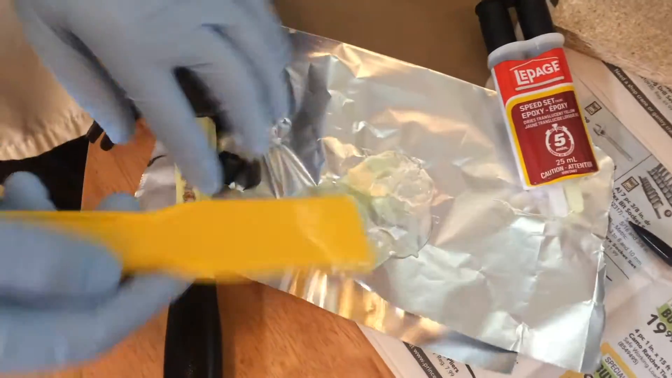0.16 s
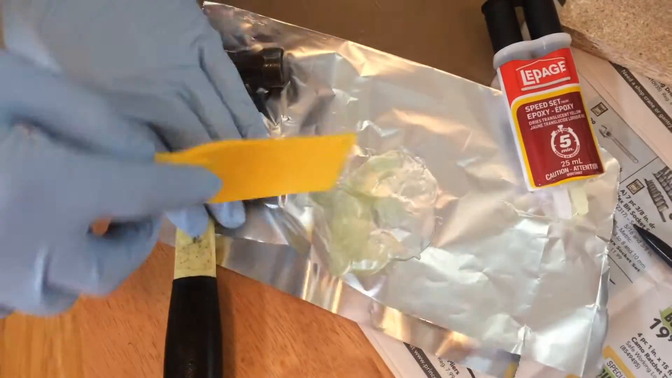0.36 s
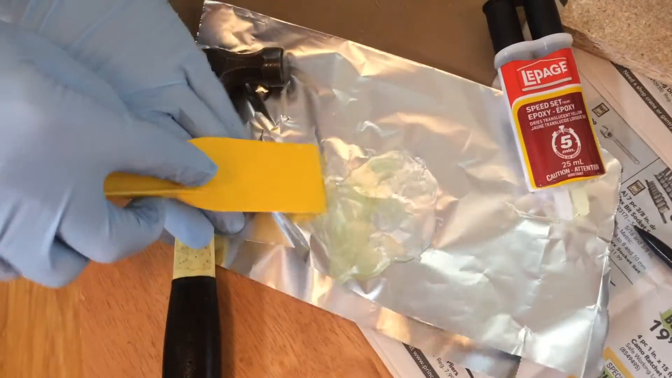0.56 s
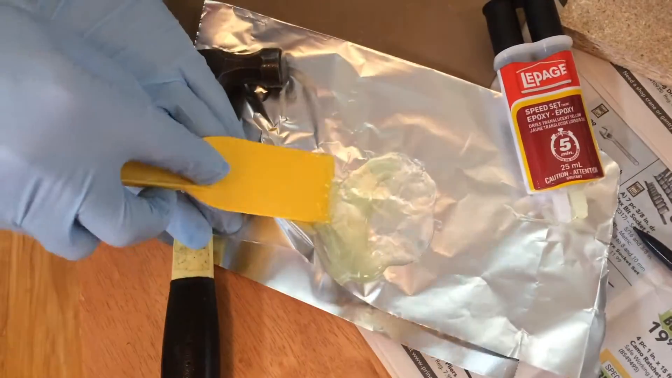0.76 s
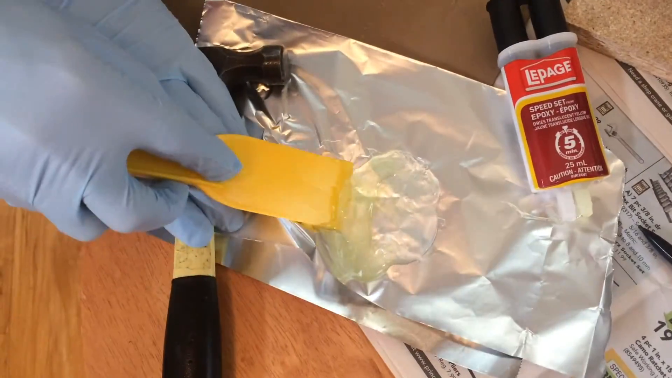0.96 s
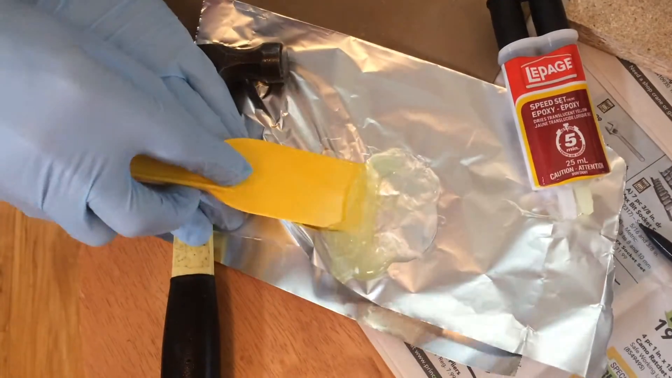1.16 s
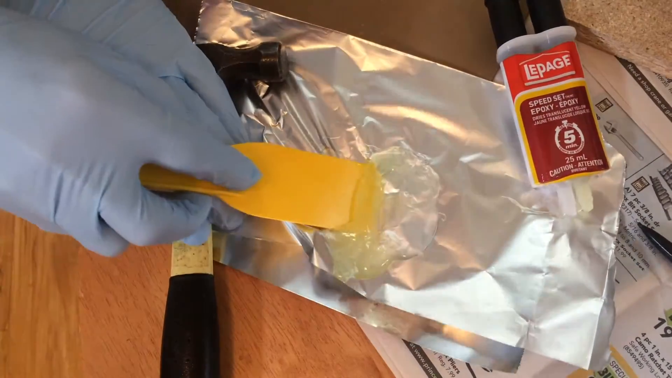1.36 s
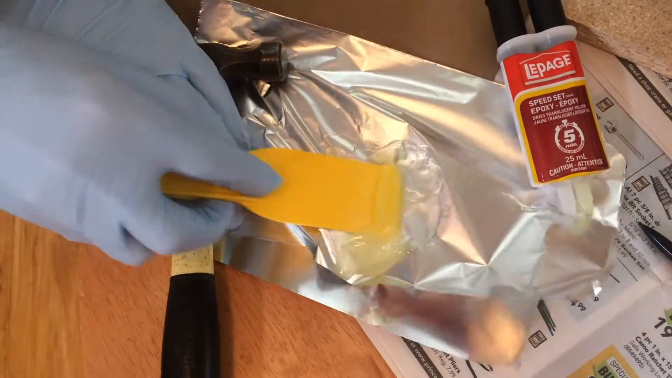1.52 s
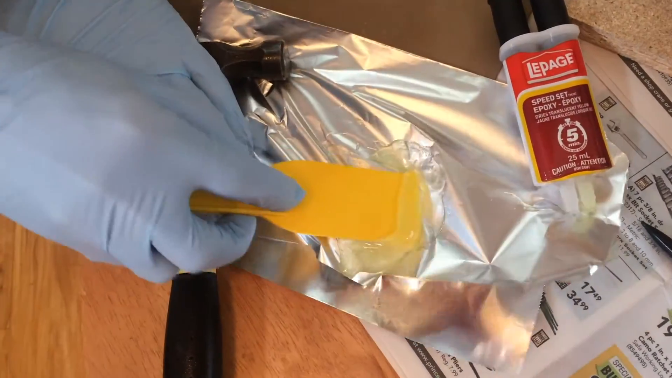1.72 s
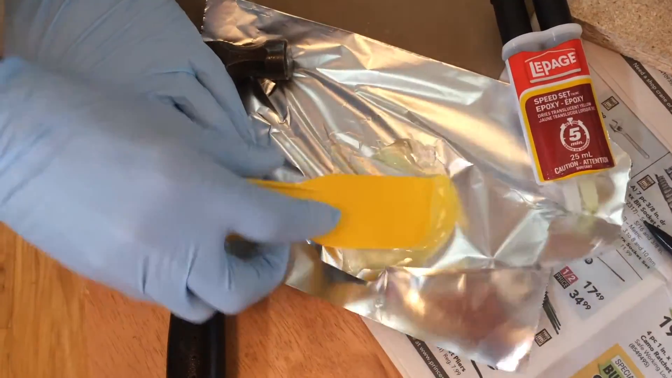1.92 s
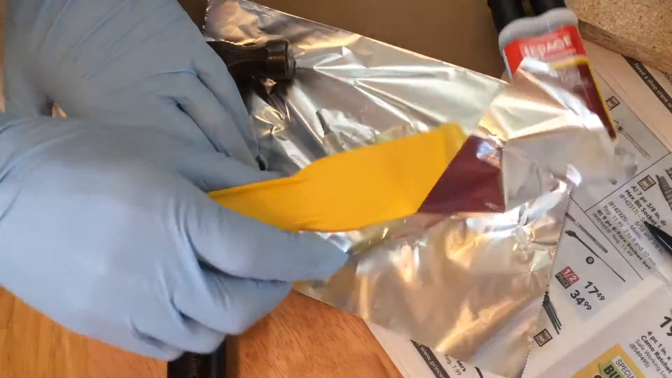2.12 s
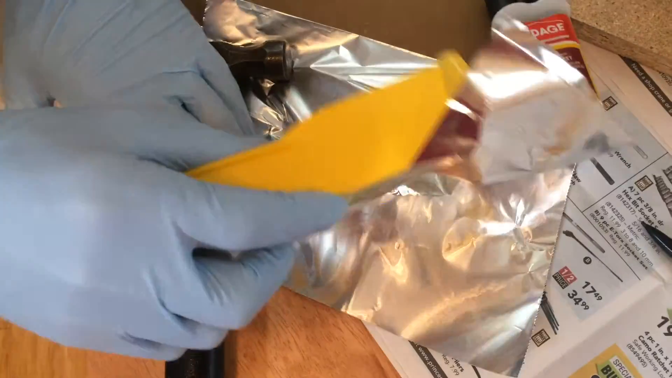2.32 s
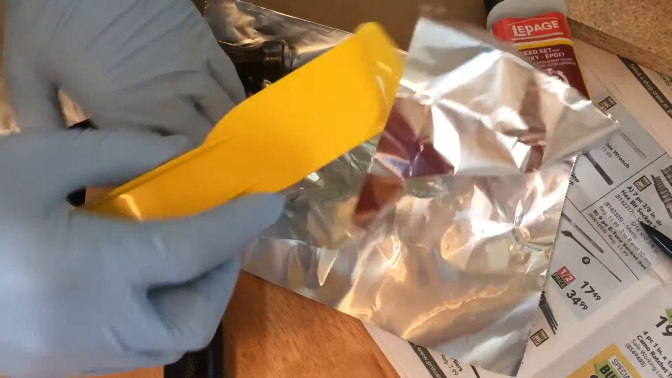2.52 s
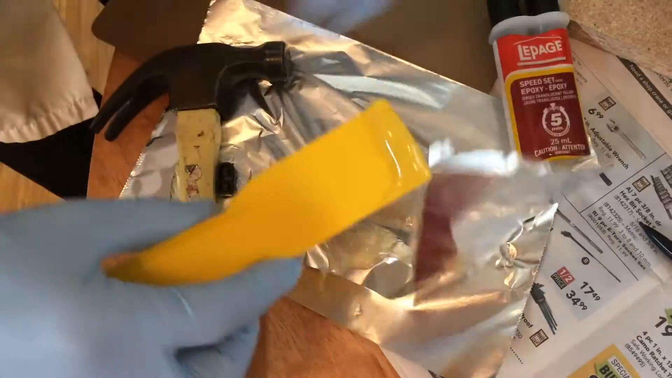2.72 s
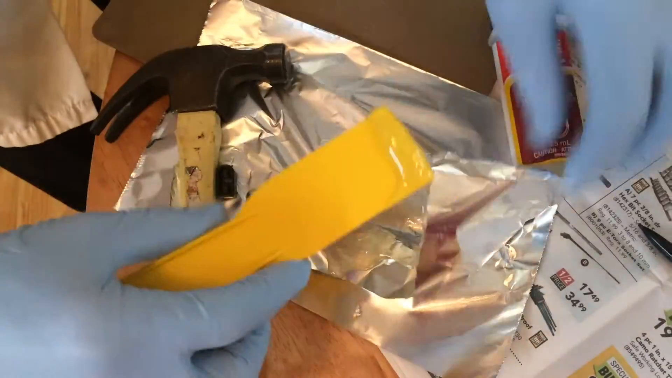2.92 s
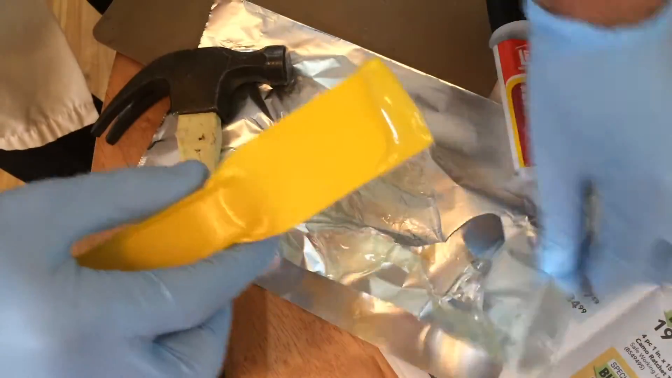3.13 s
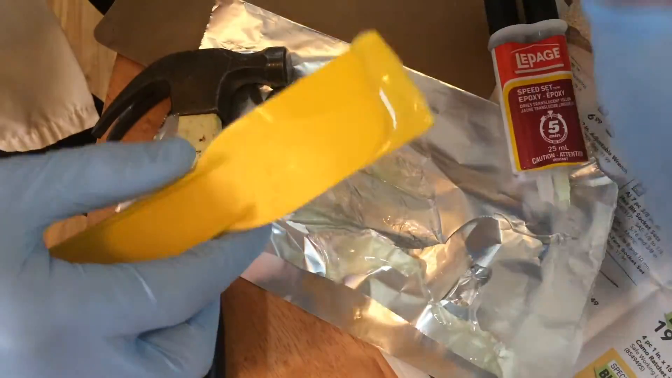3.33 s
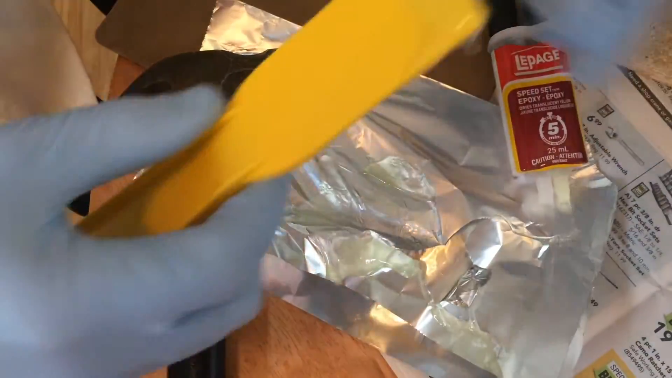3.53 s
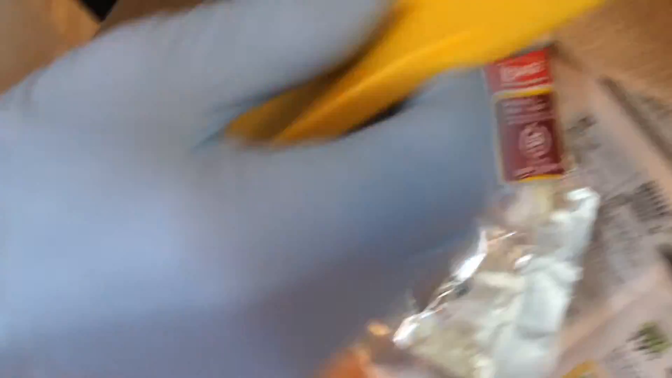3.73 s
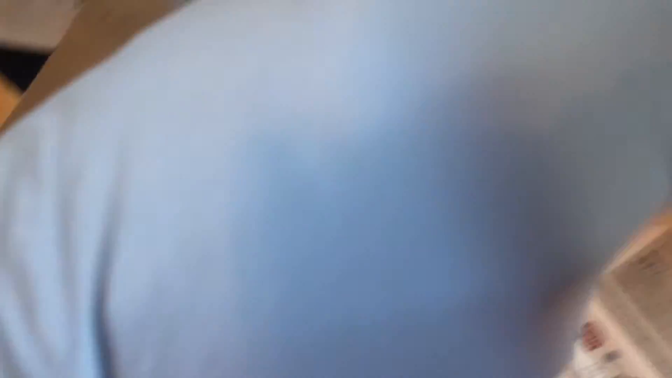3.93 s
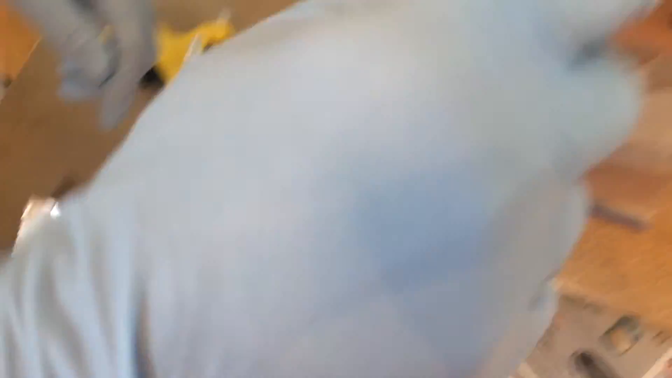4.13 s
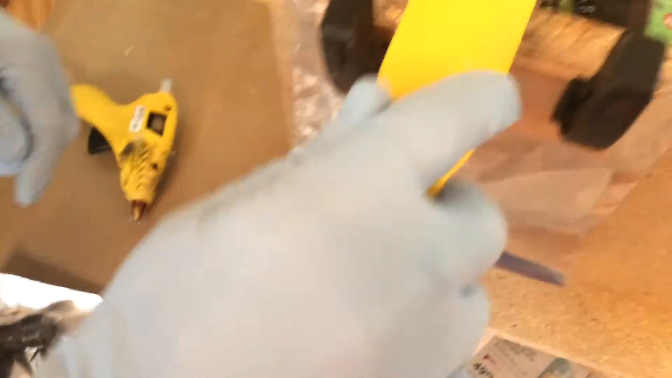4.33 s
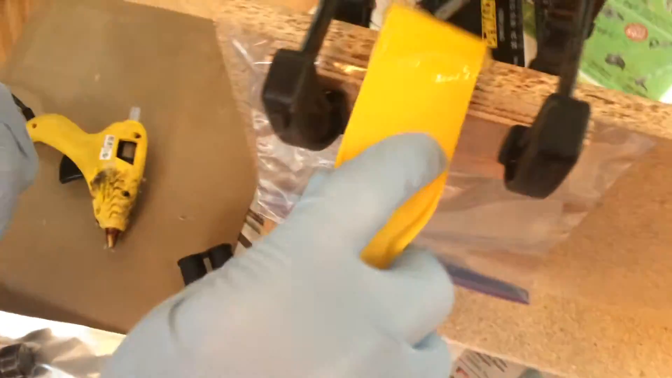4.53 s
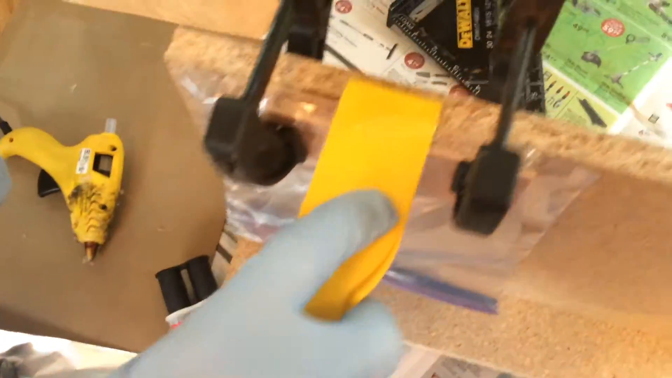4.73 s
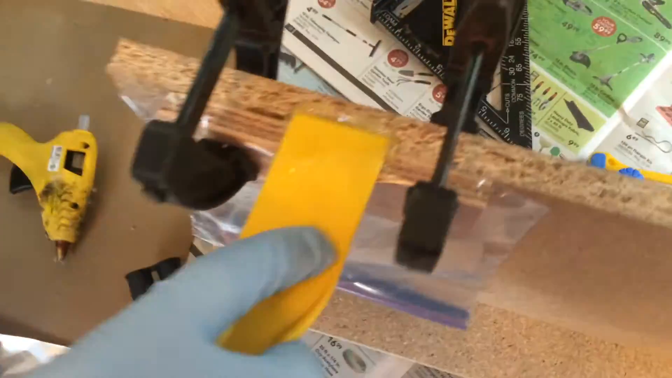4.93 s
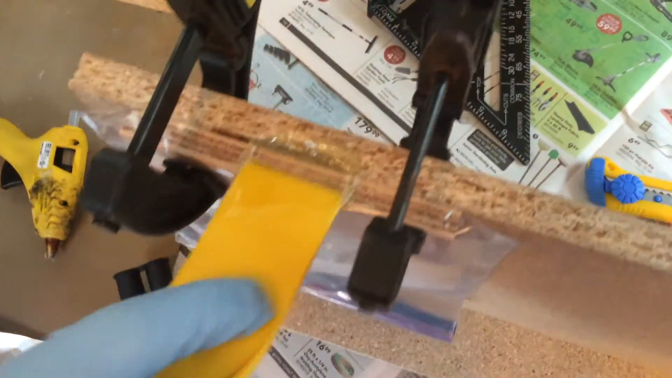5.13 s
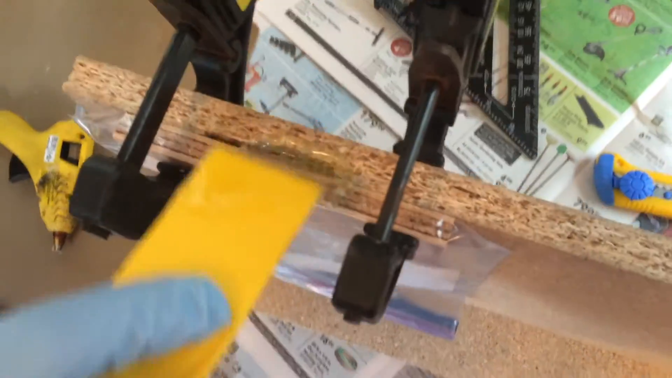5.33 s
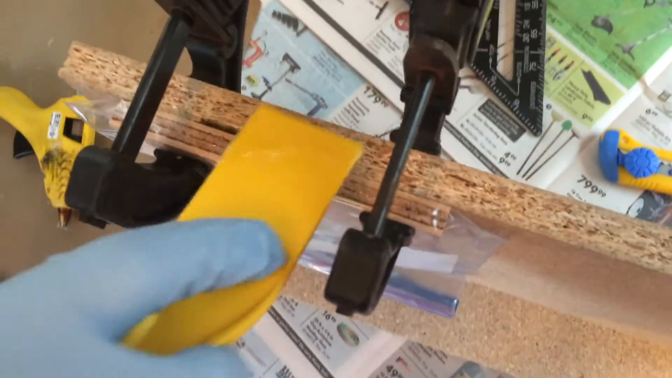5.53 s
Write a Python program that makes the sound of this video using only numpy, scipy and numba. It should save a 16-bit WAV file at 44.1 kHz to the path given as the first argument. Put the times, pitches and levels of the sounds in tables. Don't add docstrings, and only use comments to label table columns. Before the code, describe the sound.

Foil on a wooden workbench, heard close in a small quiet room with slight echo: scattered crisp pops at first, a sparse pressing stretch, then loud scraping bursts and dense peeling crackle. A brief lull, a sharp knock, a dull slap and another loud crumple come next. Finally, rubber gloves hiss softly and glue ticks lightly over faint ventilation and mains hum.

```python
import sys
import numpy as np
from scipy import signal
from scipy.fft import rfft, irfft
from scipy.io import wavfile
from scipy.ndimage import uniform_filter1d
from numba import njit

SR = 44100
rng = np.random.default_rng(int(sys.argv[2]) if len(sys.argv) > 2 else 0)


def gain_from_decibels(decibels):
    exponent = np.asarray(decibels, float) / 20
    return 10 ** exponent


def master_out(mix):
    frames = np.transpose(np.atleast_2d(mix))
    ceiling = np.clip(frames, -1, 1)
    pcm = np.round(ceiling * 32767).astype(np.int16)
    wavfile.write(sys.argv[1], SR, pcm)


N = 249606


def unit(x):
    return x / np.sqrt(np.mean(x ** 2))


def colour(x, points):
    hz, db = np.transpose(points)
    f = np.fft.rfftfreq(len(x), 1 / SR) + 1
    gain = gain_from_decibels(np.interp(np.log(f), np.log(hz), db))
    return irfft(rfft(x) * gain, len(x))


def band(x, lo_hz, hi_hz):
    return signal.sosfilt(signal.butter(2, [lo_hz, hi_hz], "band", fs=SR, output="sos"), x)


def decay(t, t60):
    return np.exp(-np.log(1000) * t / t60)


def grains(rate, spread_db, t60):
    hits = (rng.random(N) < rate / SR) * gain_from_decibels(2 * spread_db * rng.exponential(size=N))
    power = signal.lfilter([1], [1, -decay(2 / SR, t60)], hits)
    return unit(np.sqrt(power + 1e-9))


@njit
def bursts(start, size, hold, t60, hz, width, kick, noise, grit, rise, strike):
    out = np.zeros(len(noise))
    for e in range(len(start)):
        g, k = np.tan(np.pi * hz[e] / SR), width[e] / hz[e]
        norm = 1 + g * (g + k)
        level = size[e] * np.sqrt(SR / width[e])
        fade = np.exp(-np.log(1000) / (t60[e] * SR))
        band1, low1, band2, low2, front = 0., 0., 0., 0., kick
        stop = min(start[e] + hold[e] + int(t60[e] * SR) + 400, len(noise))
        for i in range(start[e], stop):
            age = i - start[e]
            swell = min(1., (age + 1) / (rise * hold[e] + 1))
            rough = grit[i] if age > 60 else 1.
            push = level * noise[i] * (rough + front) * swell
            if age == int(rise * hold[e]):
                push += level * strike[e]
            v = (band1 + g * (push - low1)) / norm
            band1, low1 = 2 * v - band1, low1 + 2 * g * v
            w = (band2 + g * (k * v - low2)) / norm
            band2, low2 = 2 * w - band2, low2 + 2 * g * w
            front *= .96
            level *= fade if age > hold[e] else 1 - .4 / (hold[e] + 1)
            out[i] += k * w
    return out


def snaps(table, ring_db, broad_db, treble_db, sharp, t60, kick, pop, rise, strike):
    s, db, hz, ms = np.transpose(table)
    one = np.ones(len(s))
    octaves = np.log2(hz / 3500)
    share_db = -3.5 + 3.5 * octaves
    start = (s * SR).astype(np.int64)
    hold = (np.clip(ms, 0, 60) * SR / 1000).astype(np.int64)
    fade_s = t60 * (np.clip(ms, .3, 30) / 4) ** 0.21
    crack_hz = 2700.0 * 2 ** (0.49 * octaves)
    blow = strike / (1 + (ms / 2.1) ** 2)
    grit = grains(1100, 1.5, .025)
    lone = (rng.random(N) < 260 / SR) * pop * rng.standard_normal(N)

    def layer(level_db, t60_s, centre_hz, width_hz):
        noise = rng.standard_normal(N) + lone
        return bursts(start, gain_from_decibels(level_db), hold, t60_s, centre_hz, width_hz,
                      kick, noise, grit, rise, blow)

    ring = layer(db + ring_db, 1.5 * fade_s, hz, np.hypot(hz / sharp, 450.))
    broad = layer(db + broad_db + 0.74 * share_db, fade_s, crack_hz, 2.0 * crack_hz)
    fizz = layer(db + share_db + treble_db, fade_s, 7600.0 * one, 17200.0 * one)
    return ring + broad + fizz


def room_air():
    # (frequency [Hz], level [dB per Hz])
    room_colour = [(30, -28), (49, -3), (69, -7.5), (87, -8), (186, -9.5), (255, -13), (390, -13.5),
                   (480, -17.5), (1100, -19), (1500, -25.5), (4000, -30), (8000, -32.5), (15300, -41.5)]
    # (frequency [Hz], level [dB], width [Hz])
    hum_bands = [(61.5, -73.5, 8.3), (179.9, -70, 9), (435, -67, 71)]
    tone = gain_from_decibels(-58) * unit(colour(rng.standard_normal(N), room_colour))
    hum = sum(gain_from_decibels(db) * unit(band(rng.standard_normal(N), f - w / 2, f + w / 2)) for f, db, w in hum_bands)
    mains = gain_from_decibels(-60.5) * np.sin(2 * np.pi * 61 * np.arange(N) / SR)
    return tone + hum + mains


def squeaks():
    # (time [s], length [s], level [dB])
    drags = [(3.73, 0.28, -65), (5.321, 0.092, -65)]
    t = np.arange(N) / SR
    shape = sum(gain_from_decibels(db) * np.sin(np.pi * np.clip((t - s) / length, 0, 1)) ** .5 for s, length, db in drags)
    centre_hz, width_hz = 1640, 150
    whistle = band(rng.standard_normal(N), centre_hz - width_hz / 2, centre_hz + width_hz / 2)
    return shape * unit(whistle)


def gloves():
    # (time [s], length [s], rustle level [dB], cupped-hand share [dB])
    strokes = [(3.385, 0.2, -58, -17), (3.616, 0.074, -53, -2.5), (3.71, 0.21, -57, -35),
               (3.925, 0.036, -50.5, -36), (3.972, 0.11, -53, -44), (4.087, 0.088, -56, -38),
               (4.166, 0.05, -53.5, -39), (2.857, 0.19, -56.5, -41), (4.24, 0.15, -60, -27),
               (4.392, 0.023, -52.5, -33.5), (4.462, 0.025, -55.5, -31), (4.71, 0.042, -61, -22),
               (4.548, 0.88, -72.5, -25), (5.179, 0.19, -75, -11)]
    # (frequency [Hz], level [dB per Hz])
    glove_colour = [(700, -3.5), (1500, -5), (3500, -3), (7000, -2.5), (10000, -7), (15300, -10.5)]
    attack_s, release_s = 0.026, 0.03
    t, hollow, broad = np.arange(N) / SR, 0, 0
    for s, length, db, cup_db in strokes:
        shape = np.clip((t - s) / attack_s, 0, 1) * np.exp(-np.clip(t - s - length, 0, None) / release_s)
        hollow = np.hypot(hollow, gain_from_decibels(db + cup_db) * shape)
        broad = np.hypot(broad, gain_from_decibels(db) * shape)
    hiss = grains(1800, 1.4, .025) * rng.standard_normal(N)
    cup = unit(band(hiss, 1900, 3200))
    return hollow * cup + broad * unit(colour(hiss, glove_colour))


def ping():
    # time [s], level [dB], frequency [Hz], t60 [s]
    s, db, hz, t60 = (3.8205, -46, 9800, .055)
    t = np.clip(np.arange(N) / SR - s, 0, None)
    return gain_from_decibels(db) * np.sin(2 * np.pi * hz * t) * decay(t, t60)


def sticky_ticks():
    # (time [s], peak [dB], ring [Hz], length [ms])
    ticks = [(2.998, -33.5, 1500, 1.5), (3.0075, -30.5, 4700, 4.9), (3.023, -25.5, 784, 7),
             (3.037, -22.5, 950, 16), (3.049, -24.5, 635, 11), (3.064, -25, 960, 10),
             (3.788, -40, 2200, 1.2), (3.7915, -36.5, 2300, 3.7), (3.7915, -34.5, 8000, 3.1),
             (3.8198, -25, 8550, 2.2), (3.823, -39, 7540, 9), (4.651, -43.5, 5580, 1.2),
             (4.6975, -29, 5140, 1.4), (4.6977, -23.5, 2240, .5), (4.702, -43, 4760, 6.9),
             (4.7105, -39.5, 2000, 4.5), (4.844, -42.5, 3230, 2.2), (4.8695, -43, 3400, 1.9),
             (4.915, -27, 2440, 0.6), (4.916, -40, 1300, 0.98), (4.967, -48, 1800, 0.99),
             (5.280, -51, 4560, .6), (5.2925, -35, 3700, 0.5), (5.2931, -32, 1040, 0.28),
             (5.298, -48, 995, 7.4), (5.348, -45, 1494, 0.75), (5.3826, -26.5, 3400, 0.3),
             (5.3945, -52, 8500, 1.1)]
    return snaps(ticks, ring_db=-10.5, broad_db=-21, treble_db=-28.5, sharp=1.46, t60=0.016,
                 kick=0.61, pop=0, rise=0., strike=4.6)


def bench(foil):
    # (frequency [Hz], level [dB], t60 [s])
    modes = [(193, 3, 0.03), (357, 2.5, 0.017), (743, 3.5, 0.013), (960, -1.5, 0.029), (1189, -8.5, 0.11),
             (573, -0.5, 0.013)]
    # (time [s], peak [dB], contact [ms])
    knocks = [(1.859, -19.5, 3.9), (2.641, -13.5, 5.6), (2.683, -29.5, 2.7), (2.705, -25, 1.2),
              (2.716, -26, 1.7), (2.7563, -2, 0.11), (2.789, -11.5, 1.8), (2.814, -26.5, 0.63),
              (2.829, -23, 1.3), (3.051, -25, 2.7), (3.19, -22, 2.4)]
    t = np.arange(SR // 4) / SR
    ring = sum(gain_from_decibels(db) * np.sin(2 * np.pi * f * t) * decay(t, np.clip(t60, .02, .2)) for f, db, t60 in modes)
    blows = np.zeros(N)
    shudder = np.zeros(N)
    for s, db, ms in knocks:
        push = np.hanning(int(ms * SR / 1000) + 3)
        at = int(s * SR)
        blows[at:at + len(push)] += gain_from_decibels(db) * push / push.sum()
        shudder += gain_from_decibels(db - 36.5) * np.exp(-np.abs(np.arange(N) / SR - s) / 0.03)
    worked = np.sqrt(np.abs(uniform_filter1d(foil ** 2, size=2000))) ** 0.9
    rumble = unit(band(signal.fftconvolve(rng.standard_normal(N), ring)[:N], 150, 670))
    knocking = signal.fftconvolve(blows, ring / np.abs(ring).max())[:N]
    return band(knocking, 200, 2100) + (gain_from_decibels(-33.5) * worked + shudder) * rumble


def patter(spread_db, t60, lo_hz, hi_hz, sharp, count, kick):
    when, pitch, long = rng.random((count, 3)).T
    start, hold = (when * N).astype(np.int64), np.zeros(count, np.int64)
    size = gain_from_decibels(spread_db * rng.exponential(size=count))
    hz = lo_hz * (hi_hz / lo_hz) ** pitch

    def layer(centre_hz, width_hz):
        return bursts(start, size, hold, t60 * (.5 + long), centre_hz, width_hz,
                      kick, rng.standard_normal(N), np.ones(N), 0., np.zeros(count))

    return layer(hz, hz / sharp), layer(np.full(count, 8100.0), np.full(count, 7200.0))


def crackle():
    # (time [s], crackle level [dB])
    effort = [(0.0, -29), (.3, -51), (.66, -34), (.9, -51.5), (1.38, -46.5), (1.53, -27.5), (1.74, -45.5),
              (1.979, -35), (2.171, -19.5), (2.33, -27), (2.558, -47.5), (2.749, -19), (2.88, -67),
              (2.988, -57), (3.192, -23), (3.288, -40.5), (3.343, -35.5), (3.43, -76.5)]
    effort_db = np.interp(np.arange(N) / SR, *np.transpose(effort), right=-120)
    body = gain_from_decibels(effort_db)
    treble = gain_from_decibels(-39 + 1.24 * (effort_db + 33.0))
    low, high = patter(1.6, .026, 1700., 6500., sharp=.9, count=5000, kick=0.)
    lone, _ = patter(4., .012, 2500., 9000., sharp=.5, count=900, kick=2.4)
    dense = body * unit(band(low, 550, 7000)) + treble * unit(band(high, 4400, 17000))
    return gain_from_decibels(-13) * body * unit(lone) + gain_from_decibels(1.0) * dense


def pops():
    # (time [s], level [dB], ring [Hz])
    early = [(0.0188, -28, 4570), (0.0318, -17, 4660), (0.0411, -32, 1470), (0.0624, -21.5, 5700),
             (0.0675, -22, 7150), (0.0751, -27, 6120), (0.1085, -20, 2930), (0.1519, -16, 3450),
             (0.1572, -19, 6100), (0.1744, -19, 5440), (0.1846, -18, 3360), (0.1884, -9.5, 10100),
             (0.1978, -21, 3530), (0.339, -21.5, 2224), (0.3667, -12, 7180), (0.3785, -17.5, 3230),
             (0.4215, -15, 7260), (0.4716, -24, 2950), (0.4843, -30, 3000), (0.5517, -23.5, 3830),
             (0.5662, -38, 2280), (0.628, -23, 3960), (0.636, -18, 5000), (0.6488, -17.5, 2520),
             (0.6595, -11, 3920), (0.665, -24, 6800), (0.6691, -7, 4520), (0.6804, -14, 10550),
             (0.6864, -9, 10030), (0.7332, -17, 6600), (0.7387, -24, 4600), (0.7438, -22, 4800),
             (0.7624, -10, 2820), (0.7662, -15, 2820), (1.8508, -15.5, 3000), (0.8569, -16, 7350),
             (0.8758, -19.5, 6560), (0.9356, -28, 7670), (0.9573, -13.5, 7280), (1.0967, -17, 9000),
             (1.1676, -42, 2930), (1.2089, -17, 9000), (1.1963, -21, 6600), (1.3216, -22, 7130),
             (1.3463, -17, 5640), (1.3542, -28, 8020), (1.4064, -25, 5220), (1.4143, -18, 6450),
             (1.4714, -7.5, 5840), (1.4843, -16, 5120), (1.489, -15.5, 2520), (1.4942, -7, 7490)]
    middle = [(1.5194, -16.5, 5430), (1.5245, -6.5, 7970), (1.53, -11, 6460), (1.5396, -7.5, 6420),
              (1.5563, -12.5, 9470), (1.5911, -13.5, 4820), (1.5997, -17, 2330), (1.604, -13.5, 5500),
              (1.6148, -13.5, 2325), (1.643, -24, 2990), (1.7325, -29, 2000), (1.7205, -19, 3920),
              (1.7659, -25.5, 3190), (1.7933, -28, 6200), (1.831, -17, 9220), (1.8386, -5, 5000),
              (1.888, -20.5, 4950), (1.8956, -11, 3360), (1.9082, -14.5, 5560), (1.9147, -29, 3100),
              (1.993, -25, 3100), (2.0097, -9.5, 3960), (2.0282, -14.5, 2110), (2.0334, -12.5, 7920),
              (2.0558, -9, 5770), (2.0629, -17, 7190), (2.0719, -13, 8480), (2.0752, -9.5, 6440),
              (2.08, -5, 6500), (2.0896, -12.5, 6500), (2.0922, -8, 5990), (2.097, -13.5, 5600),
              (2.1006, -16.5, 6680), (2.1075, -13, 3620), (2.1147, -14.5, 9090), (2.1272, -18, 8180),
              (2.1329, -13, 3450), (2.14, -20.5, 3450), (2.1475, -16, 6290), (2.1563, -6.5, 7540),
              (2.1684, -14, 4610), (2.1819, -6.5, 1550), (2.19, -7, 6370), (2.1947, -16, 3660),
              (2.2024, -19, 3320), (2.2089, -12, 2370), (2.215, -5, 7020), (2.2177, -5, 7800),
              (2.236, -5.5, 3360), (2.239, -4.5, 5210), (2.2524, -15, 7410), (2.2597, -16.5, 4440)]
    late = [(2.2703, -11, 5000), (2.2766, -21.5, 3530), (2.2834, -14, 6630), (2.2982, -27.5, 4610),
            (2.302, -11, 4520), (2.3103, -16, 5040), (2.3441, -13.5, 10980), (2.356, -12, 7490),
            (2.365, -14.5, 5680), (2.4442, -9, 7750), (2.4488, -15, 5940), (2.7041, -13.5, 6030),
            (2.7086, -11.5, 3960), (2.7142, -11.5, 3790), (2.722, -15, 3230), (2.7237, -12, 3660),
            (2.7285, -7, 8870), (2.738, -10, 6460), (2.745, -16, 6930), (2.7503, -2, 8660),
            (2.7528, -5, 7540), (2.7566, -14, 3530), (2.761, -19, 1080), (2.7715, -15, 5770),
            (2.776, -4.5, 8440), (2.7911, -17.5, 2500), (3.0257, -16, 8660), (3.044, -9, 6240),
            (3.055, -15.5, 4180), (3.0665, -11.5, 6470), (3.0912, -18, 3600), (3.1293, -13.5, 4440),
            (3.137, -13.5, 10510), (3.1406, -6.5, 6370), (3.148, -4, 6550), (3.155, -3, 5250),
            (3.1627, -2, 5680), (3.176, -11.5, 4820), (3.1804, -3.5, 2370), (3.192, -10.5, 6120),
            (3.1965, -15.5, 5040), (3.2, -9, 5120), (3.203, -13, 4690), (3.2136, -14, 4260),
            (3.2178, -14.5, 6160), (3.2421, -16, 9350), (3.2529, -19.5, 5730), (3.3187, -18, 5470),
            (3.3208, -14.5, 5770), (3.3291, -13.5, 6680), (3.3592, -24.5, 3100), (3.3671, -34.5, 2070)]
    table = [*early, *middle, *late]
    out, t = np.zeros(N + 2048), np.arange(2048) / SR
    rise = 1 - np.exp(-t * 1000 / 0.18)
    splash_fade = decay(t, 0.0069) + gain_from_decibels(-14.5) * decay(t, 0.055)
    for (s, db, hz), noise in zip(table, rng.standard_normal((len(table), 2048))):
        ring_s = 17 * (hz / 4000) ** 0.32 / hz
        ring = np.sin(2 * np.pi * hz * t + noise[0]) * decay(t, ring_s)
        splash = unit(band(noise, 0.53 * hz, min(2.3 * hz + 3500, 18000.))) * splash_fade
        at = int(s * SR)
        out[at:at + 2048] += gain_from_decibels(db) * rise * (gain_from_decibels(6.5) * ring + gain_from_decibels(-3) * splash)
    return out[:N]


def creases():
    # (time [s], level [dB], ring [Hz], length [ms])
    settle = [(.0408, -15, 1280, 3), (.0572, -14, 4750, 29), (.102, -18, 5700, 21), (.146, -15, 2370, 8.1),
              (.1546, -7.5, 6000, 5.9), (.1667, -16, 5360, 33), (.1843, -15.5, 3200, 6.1),
              (.2163, -26.5, 3100, 21), (.2492, -11.5, 1550, 1.2), (.252, -27, 2280, 19),
              (.3315, -19, 5500, 1.5), (.3385, -17, 1490, 48), (.3459, -2.5, 2170, 1.4),
              (.3546, -15, 2070, 2.5), (.3814, -11, 2810, 2.4), (.3928, -16.5, 6500, 1.4),
              (.4141, -9.5, 1440, 1.3), (.4307, -9, 6640, 1.06), (.4793, -11, 3000, 2.5),
              (.546, -15.5, 2430, 4.8), (.6178, -16.5, 5500, 3), (.642, -10, 2610, 1.16),
              (.652, -12, 4050, 17), (.6711, -11.5, 5350, 22)]
    press = [(0.7365, -15, 4410, 5.7), (0.7503, -8.5, 2430, 2.4), (0.7614, -13, 4600, 1.7),
             (0.7655, -10.5, 4530, 5.2), (0.829, -26, 4720, 3.5), (0.848, -20, 7100, 4.2),
             (.926, -16, 6400, 2.2), (0.942, -25, 4000, 2), (0.9544, -22, 7170, 8.3),
             (0.9675, -15.5, 7240, 1.17), (0.991, -20, 7350, 4.7), (1.002, -17.5, 7030, 1.9),
             (1.022, -24, 7060, 2.2), (1.0399, -12, 7330, 0.47), (1.0892, -8.5, 4300, 0.89),
             (1.18, -9.5, 2990, 1.45), (1.2007, -12, 7400, 0.91), (1.223, -21.5, 4740, 5.9),
             (1.2353, -6.5, 2780, 1.5), (1.275, -19, 3320, 4), (1.289, -17, 2508, 3),
             (1.297, -23, 3500, 5.4), (1.3051, -13.5, 7010, 0.5), (1.3705, -30, 7000, 3),
             (1.3765, -22.5, 3020, 6), (1.411, -18.5, 4010, 6.2), (1.418, -14, 4707, 1.5)]
    scrape = [(1.439, -11, 6300, 19.4), (1.472, -12, 6160, 6.7), (1.4866, -11, 2530, 7.3),
              (1.507, -14, 5000, 3.1), (1.511, -0.5, 6160, 5.2), (1.52, -12.5, 4900, 25),
              (1.558, -14.5, 4080, 0.88), (1.585, -12.5, 3770, 0.83), (1.59, -20, 4840, 8.8),
              (1.6086, -16, 2007, 6), (1.6354, -13, 5900, 2.5), (1.6554, -9.5, 5700, 1.1),
              (1.66, -10, 2770, 6), (1.68, -17, 3240, 9), (1.684, -26.5, 6260, 42),
              (1.7482, -22.5, 7100, 0.5), (1.7795, -21, 4330, 0.67), (1.8155, -11, 6000, 1.76),
              (1.835, -12.5, 4500, 3), (1.8482, -7.5, 5860, 1.1), (1.8686, -7, 5200, 0.48),
              (1.883, -12.5, 4550, 7.2), (1.897, -10, 3550, 0.5), (1.908, -9.5, 3230, 8.2),
              (1.9503, -14.5, 3380, 1.8), (1.957, -6.5, 3300, 2.4), (1.991, -27, 3020, 4.1)]
    lift = [(2.0152, -6, 6440, 1.2), (2.0229, -10, 2338, 7.7), (2.0428, -5.5, 3258, 3.5),
            (2.053, -16.5, 5850, 60), (2.0722, -10, 2024, 26), (2.1076, -11.5, 7160, 19),
            (2.129, -23, 3500, 38), (2.1566, -14, 4410, 23), (2.1765, -5.5, 3500, 3.5),
            (2.184, -11.5, 1955, 47), (2.2151, -13, 6990, 1.2), (2.234, -13, 3485, 7.5),
            (2.2428, -22, 6930, 7.7), (2.256, -18.5, 4945, 36), (2.2735, -25, 6600, 15),
            (2.289, -17.5, 4570, 33), (2.2989, -16.5, 1722, 46), (2.4165, -29, 750, 40),
            (2.3664, -20, 2140, 11), (2.4156, -17.5, 7450, 4.2), (2.4423, -12, 6960, 8),
            (2.4518, -29.5, 7600, 50), (2.4773, -18.5, 3520, 2.5), (2.487, -17, 2000, 12),
            (2.5306, -18.5, 2180, 9.4), (2.5432, -14.5, 2400, 1.1), (2.578, -31.5, 6440, 25)]
    drop_flat = [(2.6015, -14, 4560, 13.5), (2.6155, -8, 2100, 2.5), (2.634, -14.5, 3480, 45),
                 (2.6918, -8, 3600, 16), (2.712, -7, 4447, 4.5), (2.7269, -23.5, 4050, 14),
                 (2.7457, -9.5, 3424, 17), (2.767, -14.5, 6310, 22), (2.8402, -16.5, 4070, 2.1),
                 (2.8486, -22.5, 1242, 3), (2.768, -23, 931, 66), (2.85, -21, 4660, 8.4),
                 (2.8756, -30.5, 3290, 4.9), (3.0216, -16, 3204, 13), (3.038, -9.5, 5900, 29),
                 (3.0867, -14, 5500, 4.5), (3.119, -9, 5480, 7), (3.134, -11, 1500, 21),
                 (3.1268, -19, 4714, 37), (3.1385, -11, 6480, 6), (3.1473, -8.5, 5630, 8),
                 (3.156, -8.5, 5100, 12), (3.1802, -12, 2388, 3.5), (3.187, -8.5, 5690, 18),
                 (3.2007, -17, 4830, 4.3), (3.2115, -7.5, 4870, 7.5), (3.2297, -15.5, 3580, 15.4),
                 (3.251, -25.5, 5870, 7.4), (3.3179, -17, 5680, 5.5), (3.3283, -11, 6120, 5.3),
                 (3.365, -22.5, 2120, 4)]
    runs = [*settle, *press, *scrape, *lift, *drop_flat]
    return snaps(runs, ring_db=-14.5, broad_db=-11.5, treble_db=-8.0, sharp=3.4, t60=0.038,
                 kick=1.3, pop=2.0, rise=.15, strike=4.3)


def blade(foil):
    # (frequency [Hz], width [Hz], level [dB])
    blade_rings = [(2070, 130, -4.5), (2520, 87, -14.5), (3020, 150, -10.5), (990, 51, -19.5)]
    return foil + sum(gain_from_decibels(db + 6.5) * signal.lfilter(*signal.iirpeak(hz, hz / width, SR), foil)
                      for hz, width, db in blade_rings)


def foil_sheet():
    # (frequency [Hz], level [dB])
    foil_colour = [(400, -11), (800, -4.5), (1300, 0), (2000, -5), (3500, -1), (6000, 0), (9000, 0.5),
                   (12000, -1.5), (15300, 0.5)]
    return blade(colour(creases() + crackle() + pops(), foil_colour))


def scene():
    foil = foil_sheet()
    near = foil + sticky_ticks() + ping() + gloves() + bench(foil)
    t = np.arange(SR // 3) / SR
    tail = band(rng.standard_normal(len(t)), 300, 9200) * decay(t, 0.21) * (t > .004)
    echo = signal.fftconvolve(near, tail / np.sqrt(np.sum(tail ** 2)))[:N]
    return (near + gain_from_decibels(-21) * echo + room_air() + squeaks())[None]


def roll_off(x):
    return signal.sosfilt(signal.butter(12, 16440, fs=SR, output="sos"), x)


def record(dry):
    cut = signal.sosfilt(signal.ellip(10, .2, 75, 15350, fs=SR, output="sos"), dry)
    rounded = cut / (1 + np.abs(cut) ** 6) ** (1 / 6)
    mix = signal.sosfilt(signal.butter(2, 36, "high", fs=SR, output="sos"), rounded)
    return roll_off(mix)


dry = scene()
out = record(dry)
master_out(out)
```